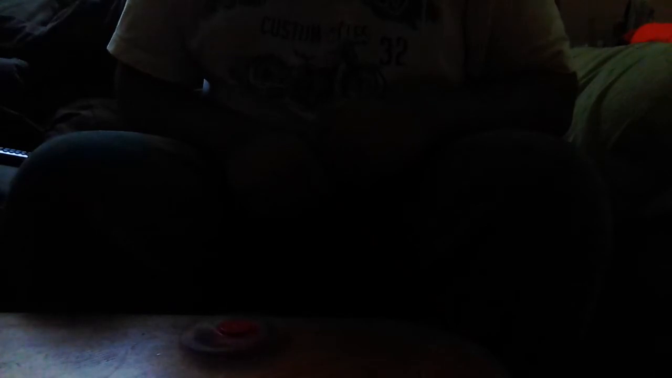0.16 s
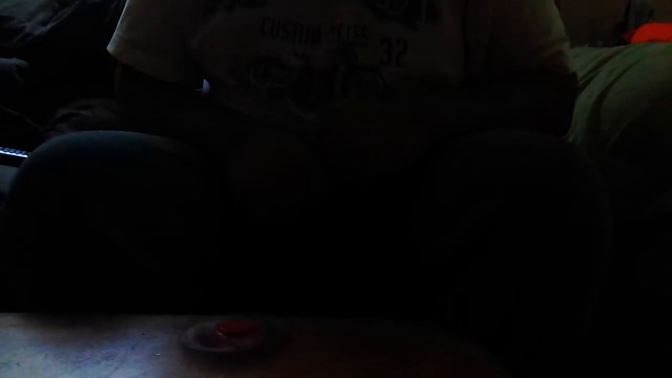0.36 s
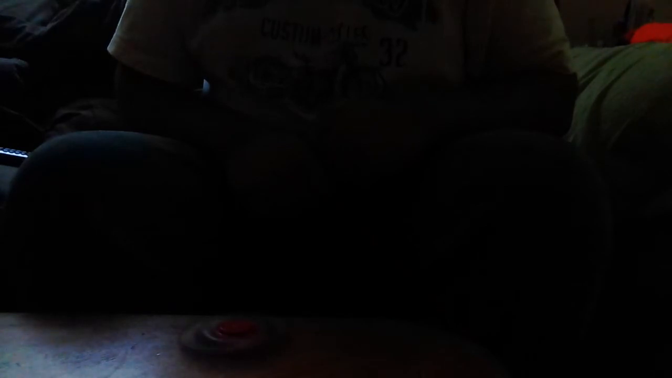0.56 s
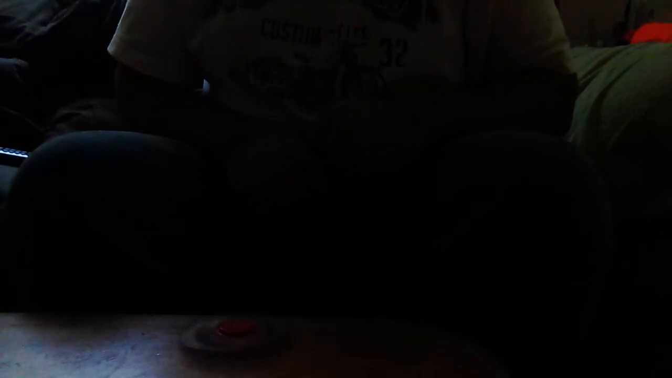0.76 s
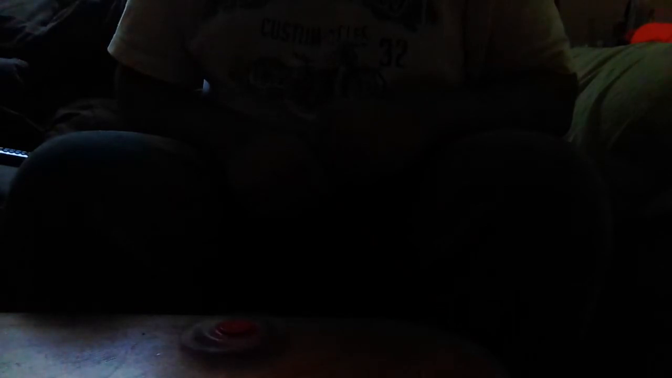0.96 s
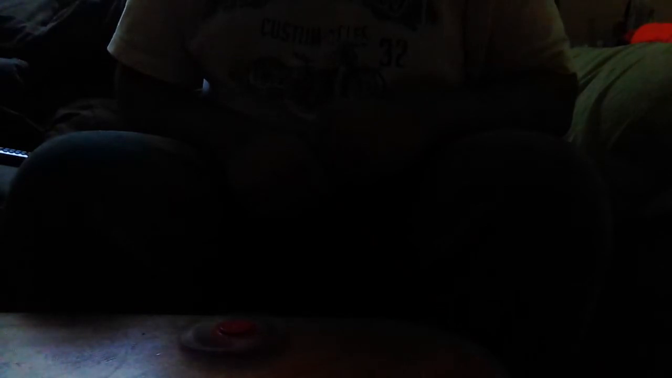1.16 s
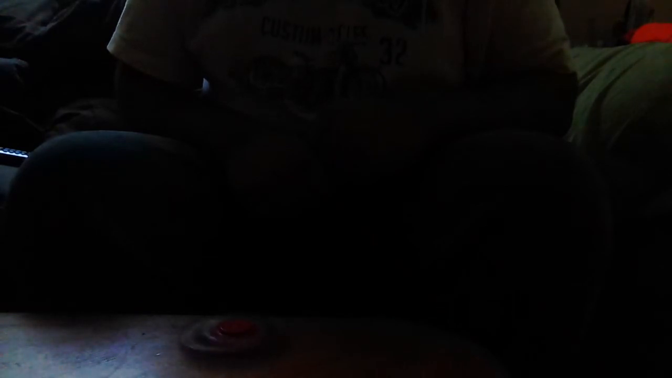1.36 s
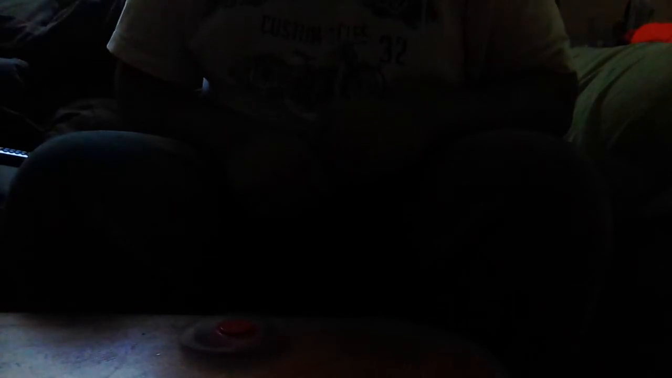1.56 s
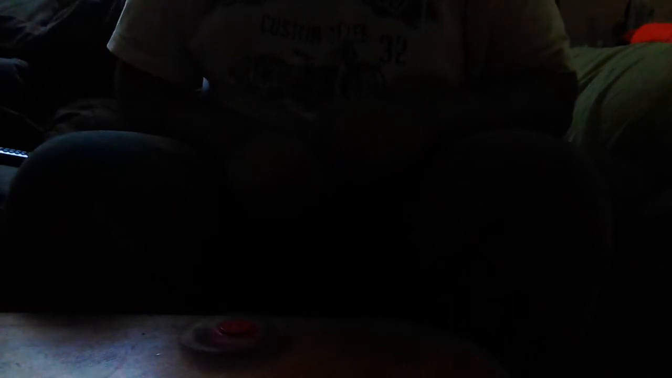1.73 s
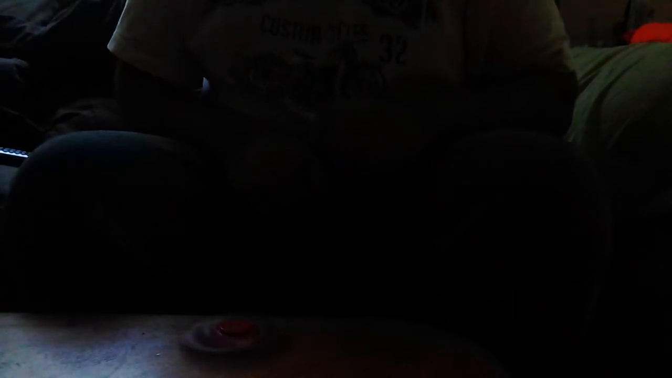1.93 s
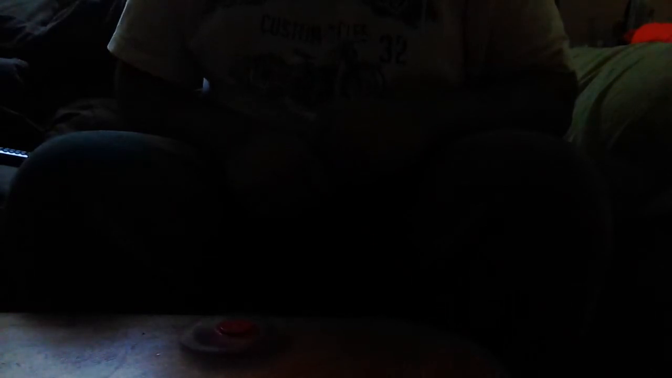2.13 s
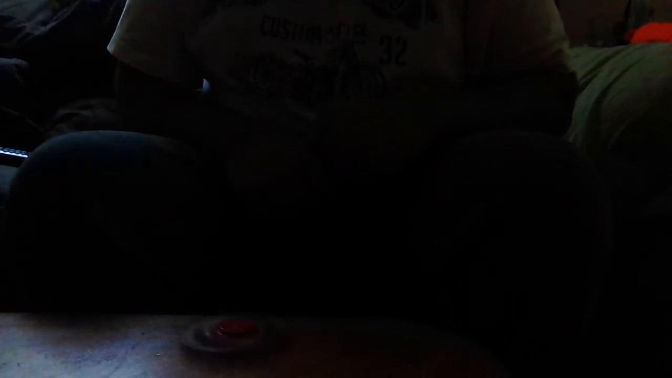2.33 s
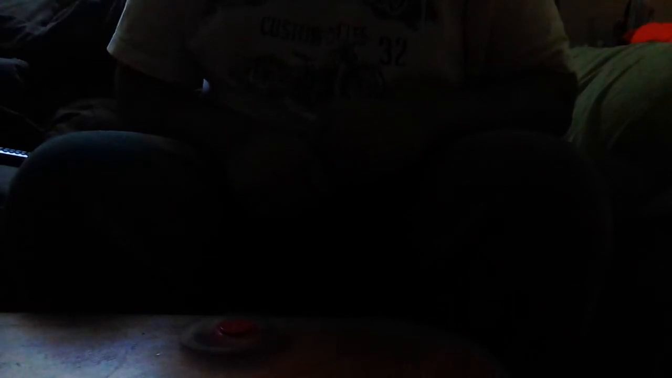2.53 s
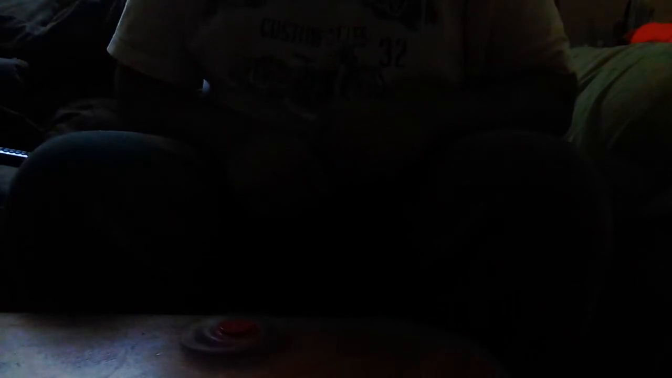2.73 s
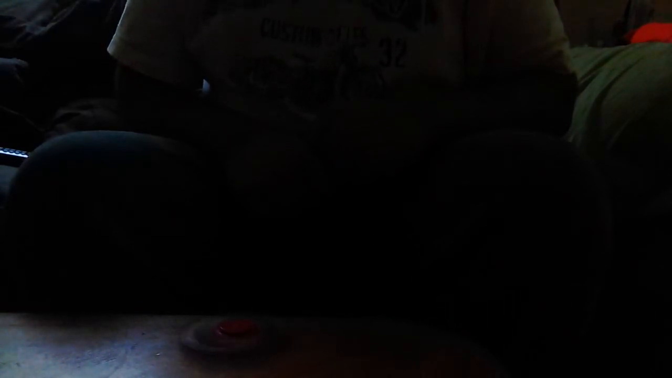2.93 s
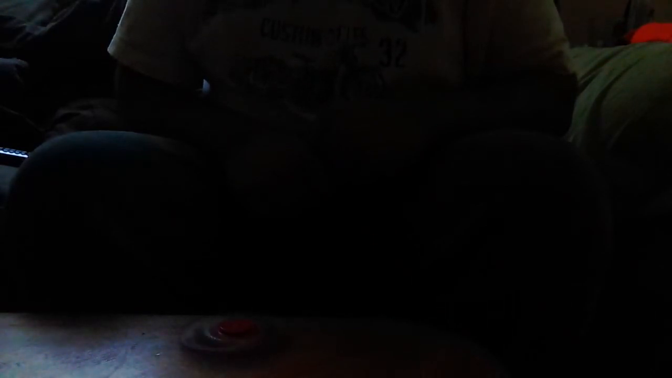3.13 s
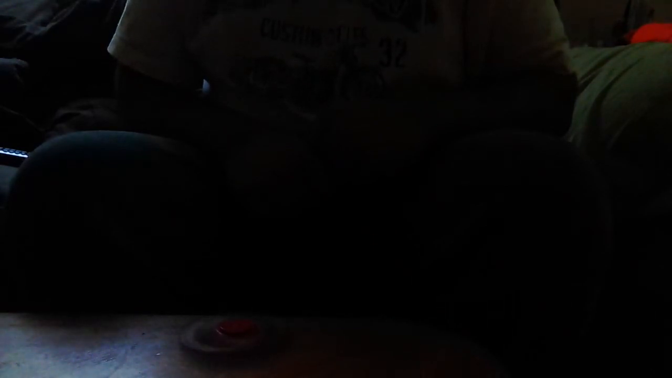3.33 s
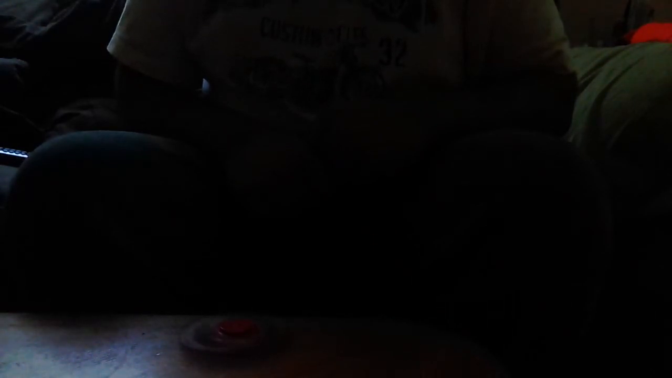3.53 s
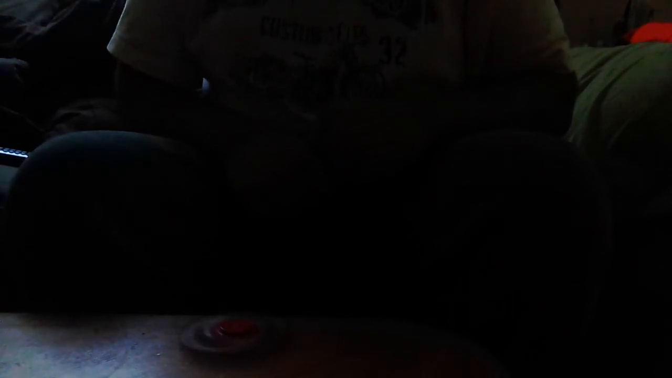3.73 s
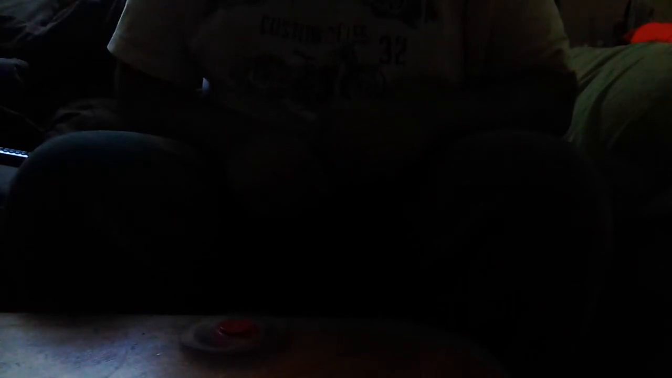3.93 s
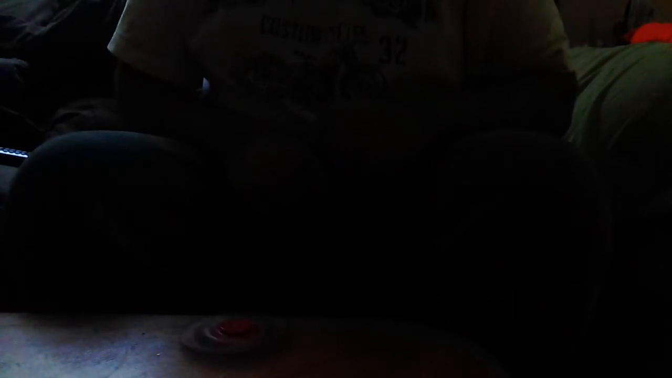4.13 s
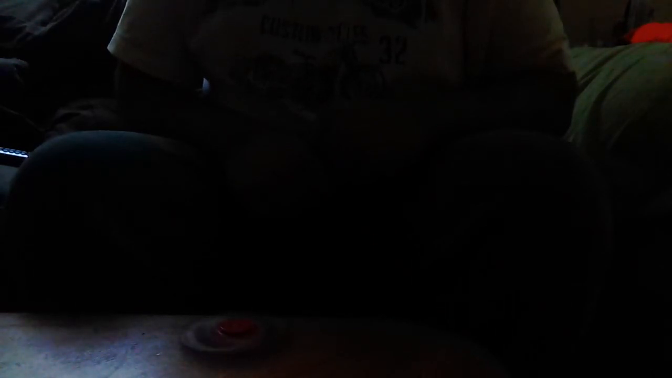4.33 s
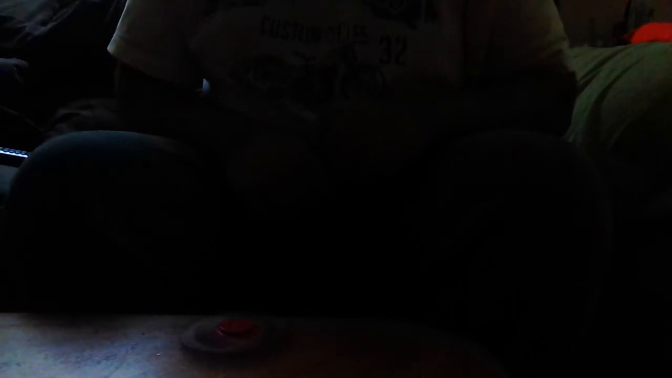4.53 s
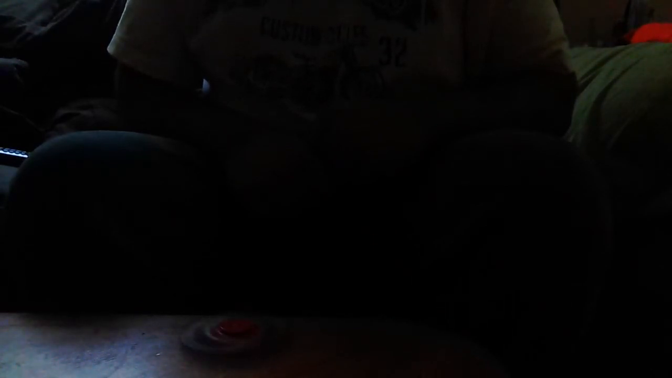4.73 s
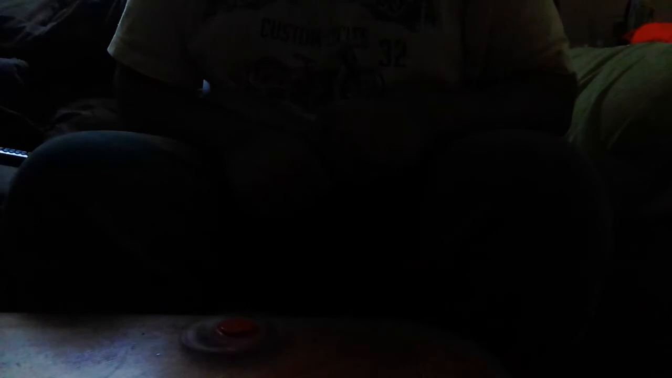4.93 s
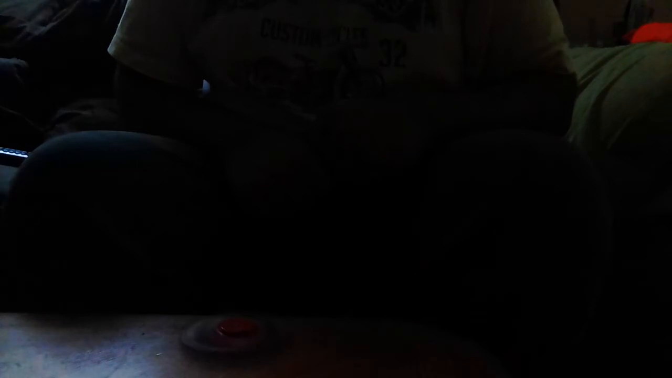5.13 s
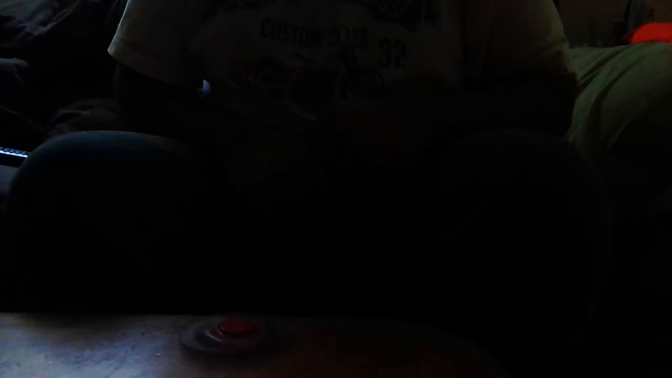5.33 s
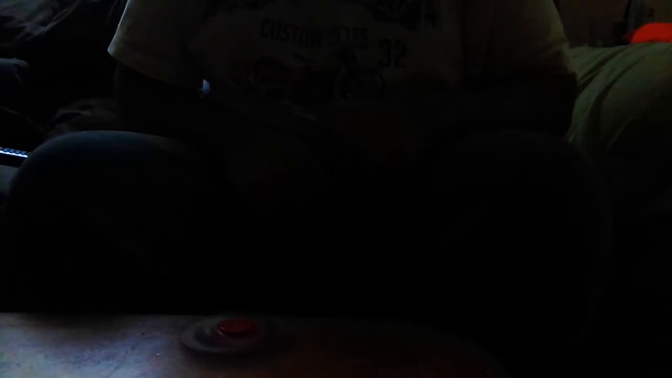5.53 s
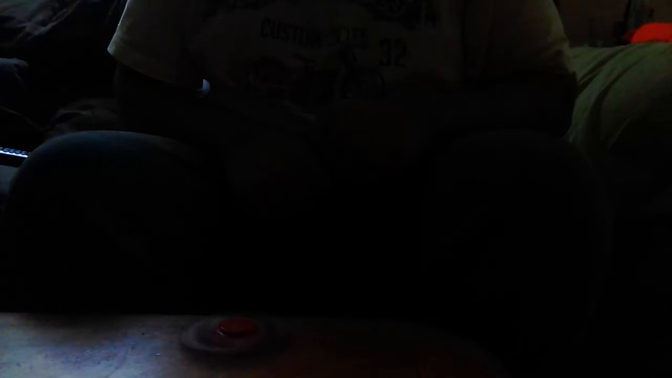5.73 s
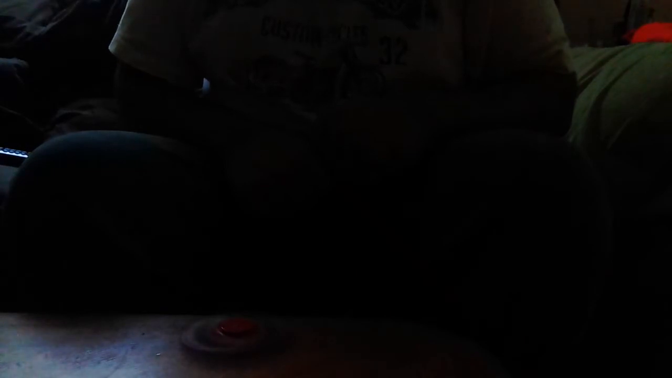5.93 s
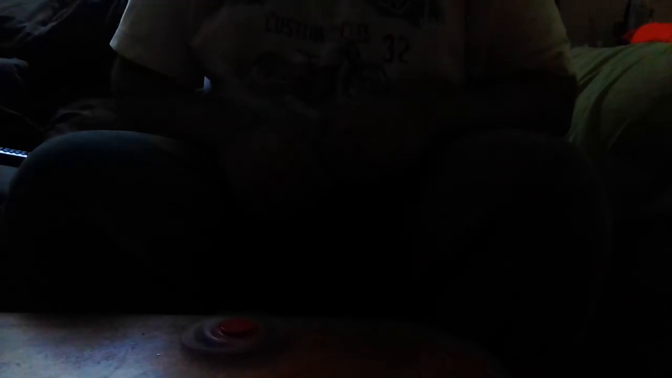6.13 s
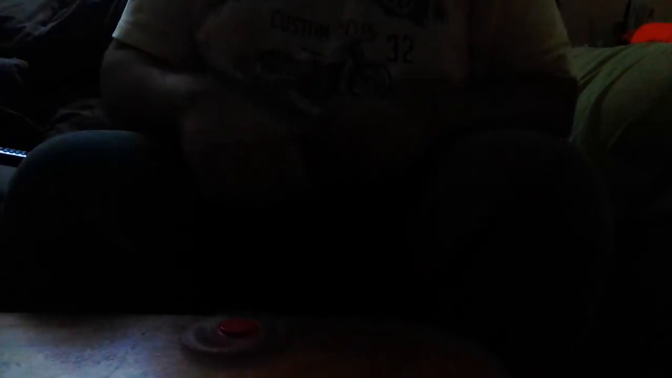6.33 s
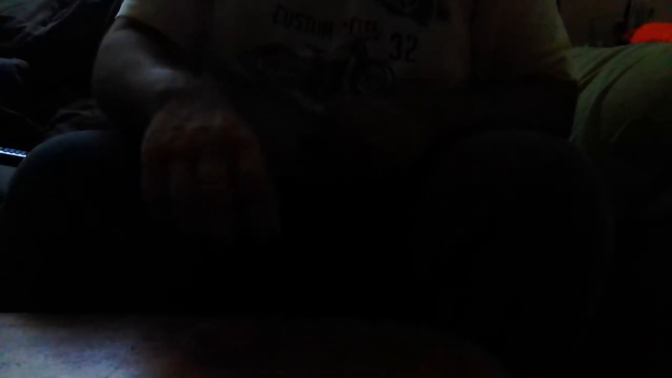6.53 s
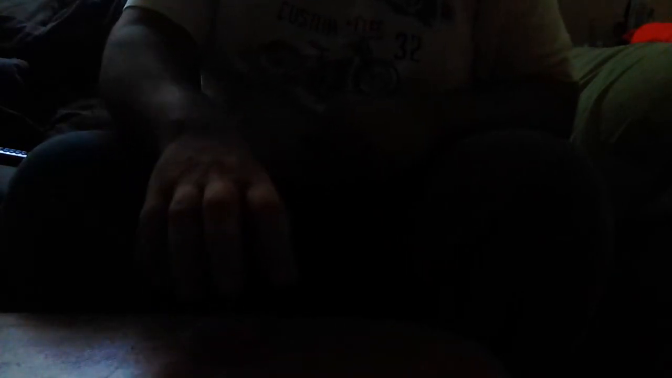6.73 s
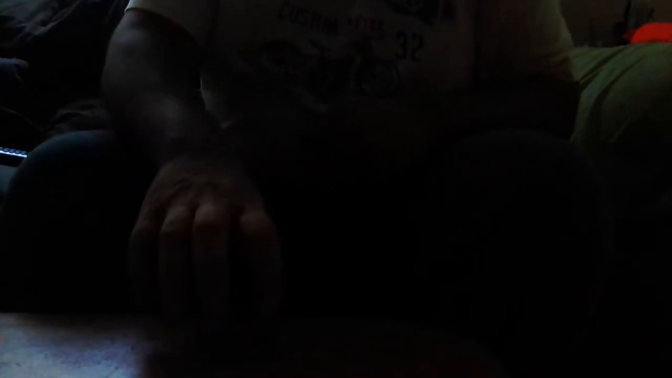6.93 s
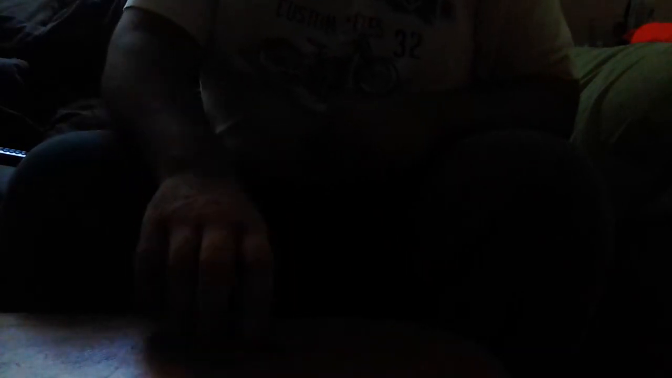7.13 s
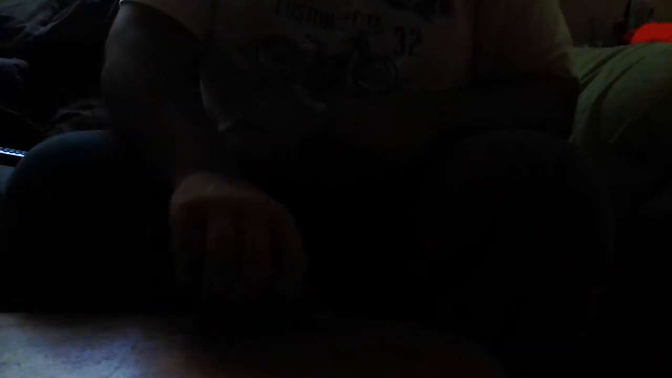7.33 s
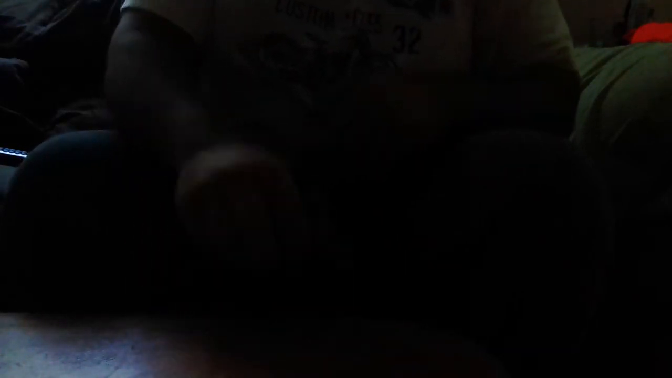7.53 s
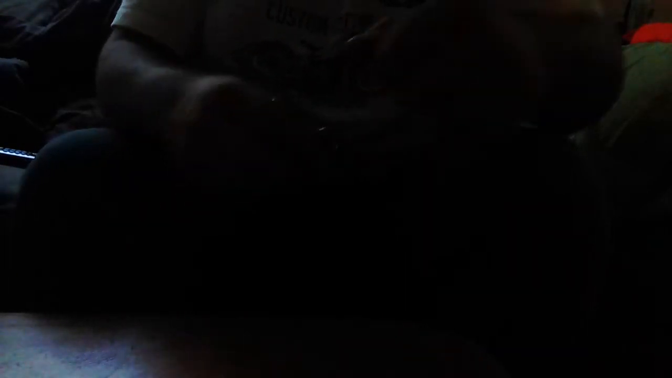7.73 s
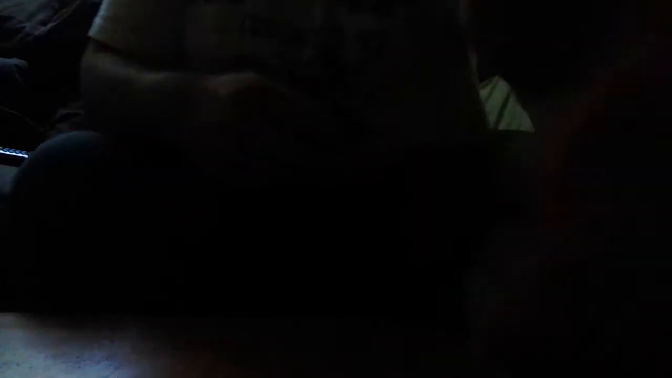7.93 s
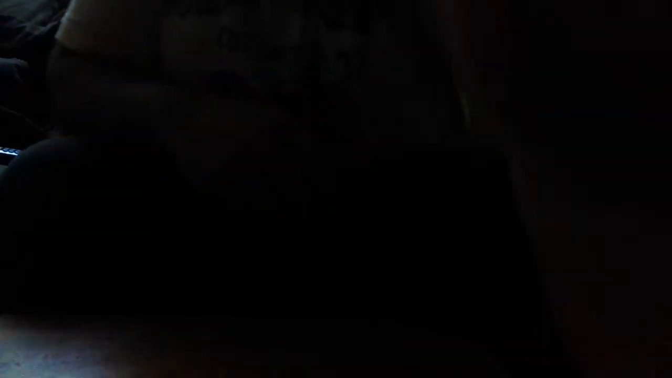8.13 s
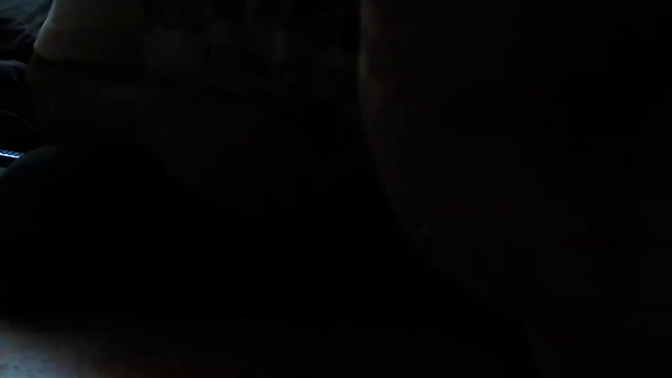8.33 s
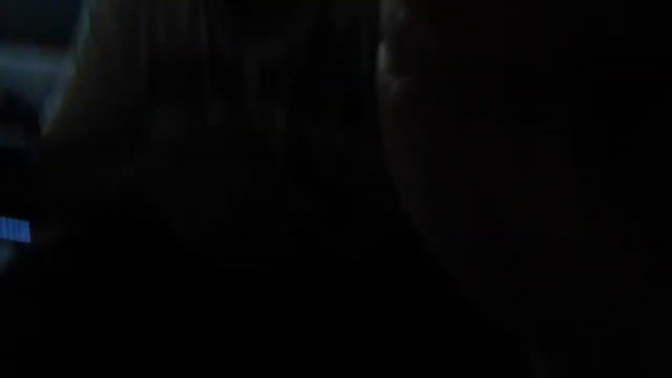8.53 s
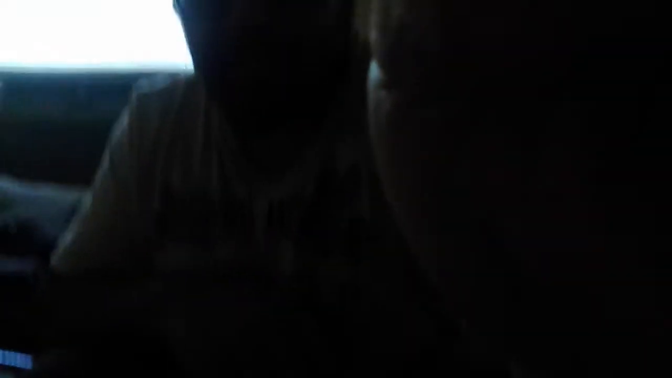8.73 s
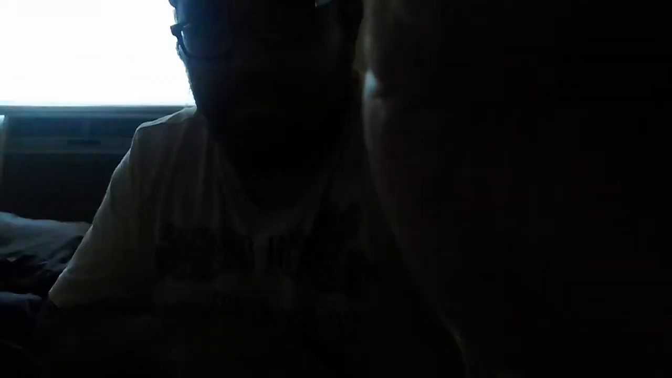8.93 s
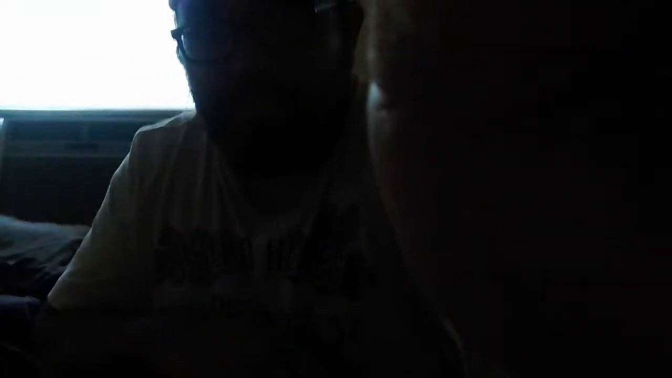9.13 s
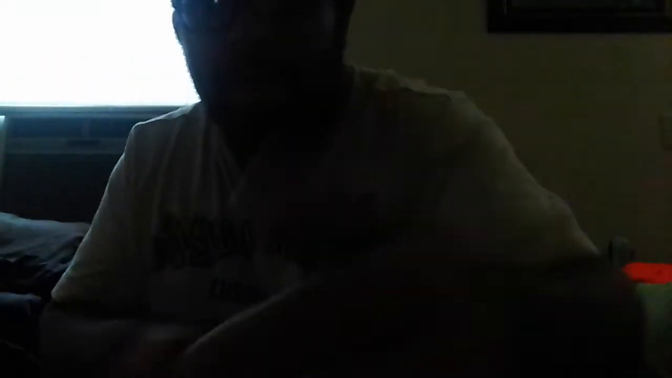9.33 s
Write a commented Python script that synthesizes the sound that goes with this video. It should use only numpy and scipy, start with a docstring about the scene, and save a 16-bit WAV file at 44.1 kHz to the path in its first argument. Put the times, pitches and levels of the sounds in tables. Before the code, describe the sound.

A fidget spinner whirs on a wooden table with a fast, pulsing rasp, gradually slowing and softening. After about seven seconds a hand stops it with a sharp, loud clack, followed by a few smaller knocks and a brief scrape as it is dragged off. The small room rings briefly. Then clothes rustle faintly and the microphone is bumped softly over a low hum.

```python
"""Fidget spinner on a table

A spinner whirs on a wooden table, its unbalanced rotor rasping the bearing once a turn as it runs down.
A hand stops it with a sharp clack and drags it off by stick-slip friction; a small room reverberates.
Then clothes rustle and a handled camera bumps softly, over room hum and a thin electronic whine."""
import sys
import numpy as np
from scipy import signal
from scipy.fft import rfft, irfft, next_fast_len
from scipy.io import wavfile
from scipy.ndimage import map_coordinates

SR = 44100
rng = np.random.default_rng(int(sys.argv[2]) if len(sys.argv) > 2 else 0)


def transcribe(signal):
    """Save signal, clipped to [-1, 1], as a 16-bit WAV file at the path in sys.argv[1]."""
    frames = np.atleast_2d(signal).T
    limited = np.clip(frames, -1, 1)
    pcm = np.round(limited * 32767).astype(np.int16)
    wavfile.write(sys.argv[1], SR, pcm)


N = 412776

START_TURNS_PER_S, START_TURN, RUN_DOWN_S = 13.06, .42, 41  # drag slows the rotor exponentially
ROLL_DB, ROLL_DB_PER_HALVING = -47.5, 9.5  # relative level at first, drop per halving of speed
RASP_DB, RASP_DB_PER_HALVING = -45, 30
# resonances of the spinner on the table: (frequency [Hz], width [Hz], gain [dB])
BODY_MODES = [(357.6, 37, -8), (454.5, 54, -5.5), (707, 28, -10), (943.6, 30, -3.5), (1176, 40, -7),
              (1262, 40, -7.5), (1630, 110, -11), (1933, 25, -7), (2510, 12, -1), (2773, 44, 0),
              (3030, 24, 3.5), (3134, 45, 1), (3321, 100, 0.5), (6050, 270, -13.5), (9060, 220, -30)]
# spectra of the rolling and of the rasp: (frequency [Hz], relative density [dB])
ROLL_SPECTRUM = [(60, -25), (150, -21), (250, -15.5), (340, -9.5), (800, -9.5), (1200, -3.5), (2200, -7),
                 (2900, 0.5), (3600, -8.5), (4450, -19), (5100, -8.5), (6300, -8.5), (7200, -25),
                 (7800, -49), (9100, -30.5), (10000, -52), (13000, -51)]
RASP_SPECTRUM = [(200, -43), (900, -10), (1700, -5), (2400, -15), (3000, -5.5), (3380, 4), (3650, -0.5),
                 (3950, 0.5), (4500, -13.5), (5200, -25.5), (6300, -20), (7500, -50.5), (13000, -75.5)]
# spells of harder rasping: (time [s], half-width [s], gain [dB])
ROUGH_SPELLS = [(0.055, 0.37, 3), (3.4, .7, 4)]
def spinner():
    """Rotating unbalance: the rotor loads the rolling balls once a turn, modulating their noise."""
    speed = np.exp(-clock(N) / RUN_DOWN_S)  # fraction of the initial speed
    turns = START_TURN + START_TURNS_PER_S * np.cumsum(speed) / SR
    rough_db = sum(db * swell(s, half_width) for s, half_width, db in ROUGH_SPELLS)
    roll_db = ROLL_DB + ROLL_DB_PER_HALVING * np.log2(speed)
    rasp_db = RASP_DB + RASP_DB_PER_HALVING * np.log2(speed) + rough_db
    lean = np.abs(np.cos(np.pi * turns)) ** 1.3
    load = .5 + .5 * lean  # the bearing never unloads fully
    roll = shaped(grit(spread_db=3, rate=500), ROLL_SPECTRUM)
    body = unit(resonate(load * grit(spread_db=4, rate=300), BODY_MODES))
    rasp = shaped(grit(spread_db=2.5, rate=350), RASP_SPECTRUM)
    rolling = amp(roll_db + .35 * wobble(30)) * (roll + amp(-.5) * body)
    rasping = amp(rasp_db + .42 * wobble(15)) * lean * rasp
    spinning = np.clip((STOP_S - clock(N)) / .005, 0, 1)
    return (rolling + rasping) * spinning


# modes of the rotor, damped by the hand: (frequency [Hz], relative level [dB], T60 [s])
ROTOR_MODES = [(520, -18.5, 0.019), (1202, -4, 0.0071), (2020, -15.5, 0.0077), (2550, -11.5, 0.0099),
               (3280, -2.5, .004), (3860, -11.5, 0.0061), (6070, -18, 0.0045)]
# spectrum of the bearing's rattle: (frequency [Hz], relative density [dB])
RATTLE_SPECTRUM = [(50, -30.5), (200, -7), (550, -3), (800, -3), (1100, 2), (1550, -5), (2000, 0),
                   (2700, -2.5), (3400, -3.5), (4500, -8.5), (6200, -7.5), (7400, -24.5), (9100, -24.5),
                   (11000, -39), (15500, -52.5)]
# knocks on the table: (time [s], peak level [dB], tilt [dB/octave], rattle T60 [s], room send [dB])
KNOCKS = [(.0335, -29.5, 3, 0.019, -17), (7.1807, -23, -8, .03, -19), (7.1867, -6, -0.5, 0.032, -2),
          (7.1996, -20, -2, .03, -8), (7.2138, -18.5, -3, .025, -5), (7.2640, -29, 4, .01, -12),
          (7.3794, -24, -9, 0.087, 0.5), (7.3988, -19.5, 4, 0.017, -15.5), (7.5308, -28, -2, 0.037, -15)]
STOP_S = KNOCKS[2][0]  # the hardest knock stops the rotor
def clacks():
    """Impact excitation: each blow sets the rotor in damped free vibration and rattles the bearing."""
    direct, send, t = np.zeros(N), np.zeros(N), clock(SR // 2)
    # neighbouring modes swing in opposite directions
    ring = sum((-1) ** k * amp(db - 60 * t / t60) * np.sin(2 * np.pi * hz * t)
               for k, (hz, db, t60) in enumerate(ROTOR_MODES))
    rolloff = [(30, -19.5), (200, -.5), (9000, 1), (11000, -5.5)]  # (frequency [Hz], gain [dB])
    for s, db, tilt, t60, send_db in KNOCKS:
        rattle = shaped(rng.standard_normal(len(t)), RATTLE_SPECTRUM) * amp(-60 * t / t60)
        colour = lambda hz: tilt * np.log2(np.clip(hz, 700, 6000) / 1000) + along(rolloff, hz)
        blow = coloured(ring + amp(-15) * rattle, colour)
        blow = amp(db) * blow / np.abs(blow).max()
        add(direct, s, blow)
        add(send, s, amp(send_db) * blow)
    return direct + room(send)


def palm():
    """Soft impact: the hand lands with the loudest clack, exciting a low thud in the table top."""
    out, t = np.zeros(N), clock(SR // 2)
    thud = band(rng.standard_normal(len(t)), centre_hz=320, octaves=1.22)
    add(out, STOP_S, amp(-34.5 - 60 * t / .41) * thud)
    return out


# resonances of the table top: (frequency [Hz], width [Hz], gain [dB])
WOOD_MODES = [(340, 24, 1.5), (474, 92, -4), (610, 107, -3), (730, 136, -0.5), (1124, 120, -3),
              (1275, 70, -7)]
# short slides of the spinner: (peak time [s], relative level [dB])
SLIDES = [(7.345, -40), (7.40, -35), (7.472, -40), (7.538, -38.5)]
def sliding():
    """Stick-slip friction: plastic dragged over wood drives its resonances and scratches faintly."""
    slips = grit(spread_db=3, rate=290)
    wood = unit(resonate(slips, WOOD_MODES))
    scratch = band(slips, centre_hz=5600, octaves=.26)
    effort = np.max([amp(db) * slide_envelope(s) for s, db in SLIDES], axis=0)
    return effort * (wood + amp(-18.5) * scratch)


def slide_envelope(s, rise_s=.013, t60=.2):
    """Frictional braking: a slide builds quickly until time s, then dies away."""
    t = clock(N) - s
    return np.where(t < 0, swell(s, rise_s), amp(-60 * np.abs(t) / t60))


# fingers and knuckles on the camera: (time [s], peak level [dB], centre [Hz], width [octaves], T60 [s])
BUMPS = [(8.438, -52.5, 702, 1.04, 0.044), (8.463, -55, 6800, 0.31, 0.0075), (8.528, -51, 700, 1.1, 0.18),
         (8.553, -46, 1500, 0.99, 0.024), (8.656, -44, 427, 0.61, 0.074), (8.783, -47.5, 376, .8, 0.077),
         (9.2413, -46, 1410, 1, .014), (9.270, -43.5, 305, 1.02, 0.11)]
def bumps():
    """Damped transients: each touch on the camera is a band of noise that decays exponentially."""
    out, t = np.zeros(N), clock(SR // 4)
    for s, db, centre_hz, octaves, t60 in BUMPS:
        bump = band(rng.standard_normal(len(t)) * amp(-60 * t / t60), centre_hz, octaves)
        add(out, s, amp(db) * bump / np.abs(bump).max())
    return out


# arm movements: (time [s], half-width [s], level [dB], centre [Hz], width [octaves])
RUSTLES = [(0.378, 0.064, -63, 160, 1.1), (5.688, 0.05, -52.5, 650, 1.3), (7.852, .25, -83, 6120, 0.37),
           (8.311, 0.066, -83.5, 7300, 0.31), (8.611, 0.098, -60.5, 540, 1.2),
           (8.78, 0.14, -68.5, 464, 1.1), (9.33, 0.051, -62, 330, 0.78), (9.337, .02, -73.5, 5840, 0.2),
           (9.345, 0.028, -70, 1700, .3)]
def clothes():
    """Friction noise: moving cloth gives soft swells of band-limited sound."""
    return sum(amp(db) * band(rng.standard_normal(N), centre_hz, octaves) * swell(s, half_width)
               for s, half_width, db, centre_hz, octaves in RUSTLES)


def squeak(s, half_width, db, hz):
    """Amplitude modulation: a faint, nearly pure tone swells and fades."""
    return amp(db) * swell(s, half_width) * np.sin(2 * np.pi * hz * clock(N) + .4 * wobble(60))


# reverberation times: (frequency [Hz], T60 [s])
ROOM_DECAY = [(100, .6), (400, 0.99), (1500, 0.91), (4000, 0.79), (7000, 1), (12000, 0.51)]
def room(x):
    """Reverberation: diffuse wall reflections decay exponentially, each frequency at its own rate."""
    hz, t, spectra = signal.stft(rng.standard_normal(SR), SR, nperseg=256)
    decay = amp(-60 * t / along(ROOM_DECAY, hz)[:, None])
    tail = signal.istft(spectra * decay, SR, nperseg=256)[1]
    tail *= 1 + 1.2 * np.exp(-clock(len(tail)) / .097)  # near walls answer first and strongest
    return signal.fftconvolve(x, tail / np.linalg.norm(tail))[:N]


# spectrum of the room air: (frequency [Hz], relative density [dB])
AIR_SPECTRUM = [(20, -28), (45, -17.5), (76, -6), (120, -9.5), (150, -12.5), (230, -11.5), (700, -11.5),
                (1000, -16.5), (2400, -25), (3800, -37), (5900, -38), (7200, -51), (9500, -74)]
# hum and electronic whine: (frequency [Hz], rms level [dB])
TONES = [(76, -79.5), (120, -82.5), (2654, -90), (5841, -92.5), (11682, -99), (11800, -99)]
def background():
    """Ambient noise: a continuous spectrum of room air under slightly unsteady lines of hum and whine."""
    air = amp(-68) * shaped(rng.standard_normal(N), AIR_SPECTRUM)
    return air + sum(amp(db) * np.sqrt(2) * np.sin(2 * np.pi * hz * clock(N) + .5 * wobble(15))
                     for hz, db in TONES)


def grit(spread_db, rate):
    """Surface roughness: tiny contacts give noise of uneven strength."""
    return rng.standard_normal(N) * amp(spread_db * wobble(rate))


def resonate(x, modes):
    """Modal superposition: parallel resonances, each applied twice for steep skirts."""
    f = np.fft.rfftfreq(N, 1 / SR)
    response = sum(amp(db) * (2j * f * width / (hz * hz - f * f + 2j * f * width)) ** 2
                   for hz, width, db in modes)
    return irfft(rfft(x) * response, N)


def coloured(x, gain_db):
    """Minimum-phase filtering: folding the cepstrum makes the gain curve causal."""
    size = 2 * next_fast_len(len(x) // 2 + 2048)
    gain = amp(gain_db(np.fft.rfftfreq(size, 1 / SR)))
    cepstrum = irfft(np.log(gain + 1e-6))
    cepstrum[1:size // 2] *= 2
    cepstrum[size // 2 + 1:] = 0
    return irfft(rfft(x, size) * np.exp(rfft(cepstrum)), size)[:len(x)]


def shaped(x, spectrum):
    """Spectral shaping, at unit rms."""
    return unit(coloured(x, lambda hz: along(spectrum, hz)))


def band(x, centre_hz, octaves):
    """Band-pass filtering with steepening skirts, at unit rms."""
    return unit(coloured(x, lambda hz: -7 * np.abs(np.log2((hz + 1) / centre_hz) / octaves) ** 1.51))


def swell(s, half_width):
    """Gaussian envelope around time s."""
    return np.exp(-((clock(N) - s) / half_width) ** 2)


def wobble(rate):
    """Random modulation, rate knots a second."""
    knots = rng.standard_normal(int(N * rate / SR) + 4)
    return map_coordinates(knots, [clock(N) * rate], order=1)


def along(points, hz):
    """Interpolation on a logarithmic frequency axis."""
    f, values = np.transpose(points)
    return np.interp(np.log(hz + 1), np.log(f + 1), values)


def amp(db):
    """Decibels to amplitude ratio."""
    return 10 ** (np.asarray(db) / 20)


def unit(x):
    """Normalisation to unit rms."""
    return x / np.sqrt(np.mean(x ** 2) + 1e-20)


def clock(size):
    """Sample times in seconds."""
    return np.arange(size) / SR


def add(track, s, x):
    """Superposition of x on the track at time s."""
    part = track[round(s * SR):][:len(x)]
    part += x[:len(part)]


def scene():
    """Superposition: direct and reverberant sound sum at one microphone, alike in both channels."""
    table = spinner() + sliding()
    faint = squeak(s=5.1, half_width=.05, db=-52.5, hz=866) + bumps() + clothes()
    mono = amp(-1) * table + amp(-9.5) * room(table) + clacks() + palm() + faint + background()
    return np.array([mono, mono])


def record(dry):
    """Band limiting: the microphone dulls the top octave, and each channel adds faint hiss."""
    f, top_hz = np.fft.rfftfreq(N, 1 / SR), 15700
    microphone = amp(along([(11800, 0), (13000, -15.5)], f))
    hiss_db = along([(20, -94), (80, -71), (1200, -70.5), (4000, -89), (12000, -91.5)], f)
    hiss = rfft(rng.standard_normal((2, N))) * amp(hiss_db)
    return irfft((rfft(dry) * microphone + hiss) * (f < top_hz), N)


dry = scene()
out = record(dry)
transcribe(out)
```